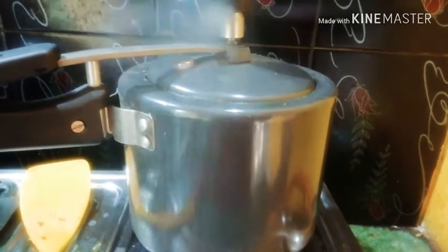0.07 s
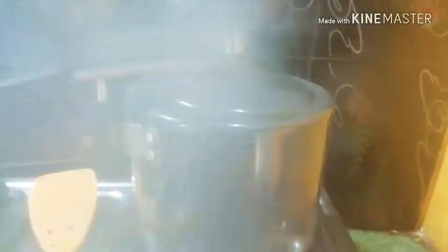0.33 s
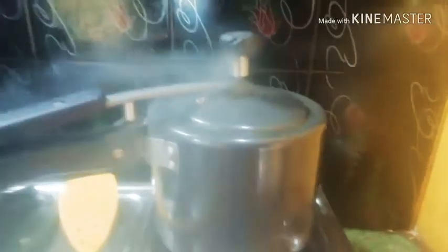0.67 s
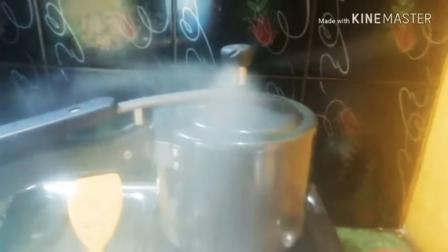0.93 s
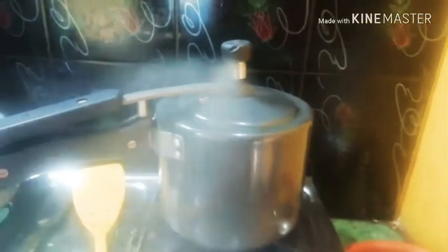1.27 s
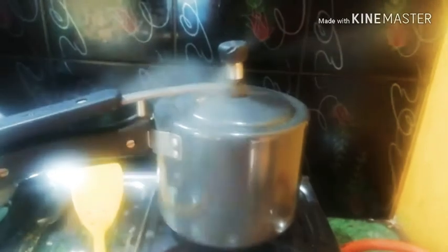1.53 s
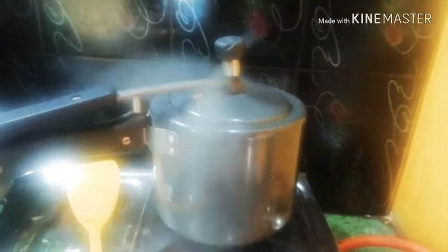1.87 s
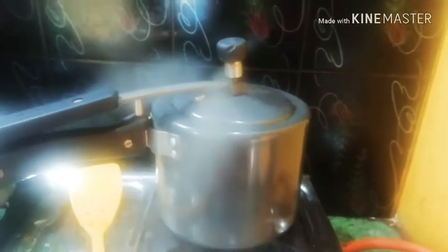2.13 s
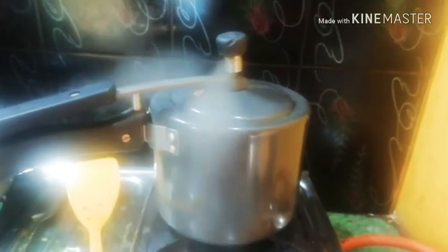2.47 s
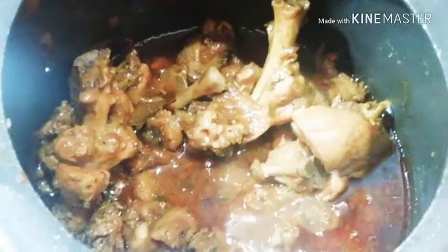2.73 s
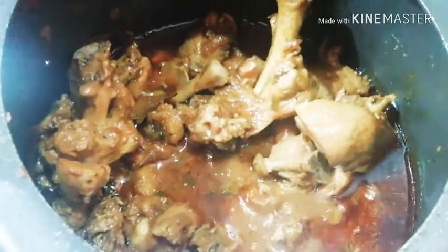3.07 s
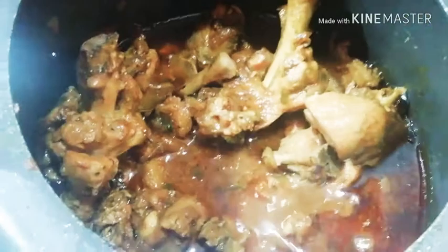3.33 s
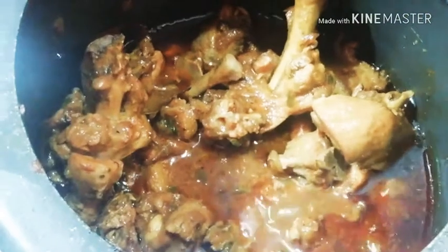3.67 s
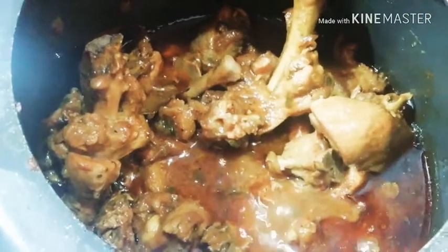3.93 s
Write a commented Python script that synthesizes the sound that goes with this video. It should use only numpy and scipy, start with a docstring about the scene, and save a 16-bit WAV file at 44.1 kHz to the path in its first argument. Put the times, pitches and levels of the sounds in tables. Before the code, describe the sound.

A pressure cooker vents steam with a thin, breathy whistle that fades by about 1 second. Faint hissing and a few wet spurts continue over a low stove rumble. At 2.9 seconds the sound switches to the open pot, closer and louder, with a soft thump and a fading low hum. Thick gravy simmers, gurgles and plops, fat spits, and a large bubble squeaks near 3.8 seconds.

```python
"""A pressure cooker vents on a kitchen stove: the steam jet sings a thin, breathy whistle that fades after a
second, while the valve hisses on and throws a few wet spurts. Near three seconds the scene cuts to the open
pot, close up and in stereo. A soft thump sounds at the cut and a low hum dies back; thick gravy seethes,
gurgles and plops, fat spits, and near the end a large bubble squeaks as it empties. A faint electrical whine
runs through both scenes."""
import sys
import numpy as np
from scipy import signal
from scipy.fft import rfft, irfft, next_fast_len
from scipy.io import wavfile
from scipy.ndimage import map_coordinates

SR = 44100
rng = np.random.default_rng(int(sys.argv[2]) if len(sys.argv) > 2 else 0)


def waveform_to_disk(signal):
    """Save audio, clipped to [-1, 1], as 16-bit WAV at the path in sys.argv[1]."""
    frames = np.transpose(np.atleast_2d(signal))
    scaled = np.clip(frames, -1, 1) * 32767
    samples = np.round(scaled).astype(np.int16)
    wavfile.write(sys.argv[1], SR, samples)


N = 176400
T = np.arange(N) / SR
CUT_S = 2.927  # the open pot is heard from here on


def amp(db):
    """Decibels to gain."""
    return 10 ** (np.asarray(db) / 20)


def unit(x):
    """Scale to rms 1."""
    return x / np.sqrt(np.mean(x ** 2) + 1e-20)


def along(points, hz):
    """Read (freq_hz, value) points on a log frequency axis."""
    freqs, values = np.transpose(points)
    return np.interp(np.log(hz + 1), np.log(freqs + 1), values)


def curve(points):
    """An envelope through (time_s, value) points."""
    return np.interp(T, *np.transpose(points))


def wobble(rate):
    """A smooth random curve, rate knots a second."""
    return map_coordinates(rng.standard_normal(8192), [T * rate], mode="wrap")


def filtered(x, response):
    """Filter x by a gain given as a function of frequency."""
    size = next_fast_len(N + SR // 4)
    return irfft(rfft(x, size) * response(np.fft.rfftfreq(size, 1 / SR)), size)[..., :N]


def noise(colour):
    """Noise of rms 1 with a (freq_hz, level_db) colour."""
    return unit(filtered(rng.standard_normal(N), lambda f: amp(along(colour, f))))


def band(hz, octaves):
    """Noise of rms 1 in a soft-skirted band."""
    return unit(filtered(rng.standard_normal(N), lambda f: 1 / (1 + (np.log2((f + 1) / hz) / octaves) ** 2)))


def pan(db):
    """Stereo gains that put the left side db above the right."""
    return amp(np.array([[.5], [-.5]]) * db)


def decay(start_s, decay_s):
    """A sudden attack with an exponential tail."""
    return (T >= start_s) * np.exp(-np.abs(T - start_s) / decay_s)


def swell(peak_s, width_s):
    """A bell-shaped rise and fall."""
    return np.exp(-.5 * ((T - peak_s) / width_s) ** 2)


def bubbles(rows):
    """Each bubble rings as a damped sine: start_s, level_db, pitch_hz, ring_cycles."""
    out, t = np.zeros(N + SR), np.arange(SR // 20) / SR
    for start_s, db, hz, cycles in rows:
        ring = np.sin(2 * np.pi * hz * t) * np.exp(-t * hz / max(cycles, .2))
        out[int(start_s * SR):][:len(t)] += amp(db) * ring
    return out[:N]


def swarm(per_s, hz, octaves, cycles, scatter_db):
    """Many small bubbles, random in time, level and pitch; rms 1."""
    when, strength, tuning = rng.random((int(per_s * N / SR), 3)).T
    pitches = hz * 2 ** (octaves * (2 * tuning - 1))
    return unit(bubbles(zip(when * N / SR, scatter_db * strength, pitches, np.full(len(when), cycles))))


def in_pot(x, ring_db):
    """The air in the pot rings along with the sound."""
    # air resonances: pitch_hz, width_hz, gain_db
    modes = [(479, 28, 4.5), (635, 13, -16), (765, 9.6, -13), (1108, 13, 4.5), (1220, 19, -4),
             (1330, 22, -2), (1424, 34, 2), (1506, 16, 4.5), (1750, 11, 3), (2240, 8.2, -6)]
    ring = lambda f: sum(amp(db) * 1j * f * width / (hz * hz - f * f + 1j * f * width)
                         for hz, width, db in modes)
    return x + amp(ring_db) * filtered(x, ring)


def room(x, t60_s=0.21):
    """Short stereo echo of the pot walls and kitchen tiles."""
    t = np.arange(SR // 3) / SR
    early_lift = 1 + 2.5 * np.exp(-t / 0.0054)
    tail = rng.standard_normal((2, len(t))) * amp(-60 * t / t60_s) * early_lift
    return signal.fftconvolve(np.atleast_2d(x), tail / np.linalg.norm(tail[0]), axes=1)[:, :N]


def kitchen():
    """Room tone: the low rumble of the stove under an even hiss."""
    # room tone spectrum: freq_hz, level_db
    colour = [(13, -36.5), (22, -1.5), (48, -3), (70, -5), (142, 0), (219, -11), (365, -21), (396, -18.5),
              (505, -21.5), (3730, -32.5), (7730, -31), (11000, -33), (14000, -33)]
    # fader on the room tone: time_s, level_db
    level = [(0, -60.5), (1.2, -61), (2.3, -61.5), (2.62, -62), (2.75, -64.5), (2.92, -64)]
    # gentle EQ cut: freq_hz, gain_db
    eq = [(500, -2.5), (2000, -4.5), (5000, -2.5), (7800, -3), (12000, -5)]
    return amp(curve(level)) * filtered(noise(colour), lambda f: amp(along(eq, f)))


def whine():
    """Thin electrical tones that drop in level at the cut."""
    # sine tones: pitch_hz, before_cut_db, after_cut_db
    tones = [(15429, -75.2, -79), (6000, -95, -110)]
    return sum(np.sqrt(2) * amp(np.where(T < CUT_S, before, after)) * np.sin(2 * np.pi * hz * T)
               for hz, before, after in tones)


def hum(pitch_hz=65.2):
    """A soft thump and a low hum that dies back, over a steady drone and rumble."""
    # envelope of the hum: time_s, level_db
    level = [(2.93, -41.5), (3.0, -37), (3.06, -38.5), (3.12, -40.5), (3.17, -47), (3.26, -44), (3.36, -51),
             (3.55, -54), (4, -67)]
    # drone by the open pot: pitch_hz, level_db
    drone_tones = [(100, -64.5), (119, -70), (193.5, -68), (231, -74), (295, -70), (361, -94)]
    low = amp(curve(level)) * np.sin(2 * np.pi * pitch_hz * (T - CUT_S) + 0.13 * wobble(3.3))
    drone = sum(amp(db + 0.64 * wobble(8.4)) * np.sin(2 * np.pi * hz * T + .5 * wobble(6))
                for hz, db in drone_tones)
    rumble = amp(-61.5) * noise([(25, 5.5), (70, 10), (130, 14), (200, -48), (600, -70)])
    thump = -amp(-34) * decay(CUT_S, decay_s=0.15)
    return np.sqrt(2) * (low + drone) + rumble + thump


def simmer():
    """The gravy seethes as a wide noise bed, with small bubbles and fine fizz on top."""
    # spectrum of the bed: freq_hz, level_db
    colour = [(76, -25), (130, 2.5), (159, -5), (232, -2.5), (413, -6.5), (485, -3.5), (654, -9.5),
              (865, -11.5), (995, -15.5), (1240, -7.5), (1420, -11.5), (2040, -16.5), (2350, -10.5),
              (3040, -18.5), (5760, -19.5), (9110, -24), (15300, -24)]
    # envelope of the bed: time_s, level_db
    level = [(2.93, -58), (3.1, -55), (3.35, -54.5), (3.44, -56), (3.6, -53.5), (3.75, -54), (4, -54)]
    # stereo image of the bed: freq_hz, left_right_correlation
    correlation = [(130, 0.92), (290, .75), (420, -0.12), (640, -0.64), (950, 0.59), (1400, 0.23),
                   (3000, -0.066), (15000, 0.074)]
    # pan across the spectrum: freq_hz, left_minus_right_db
    balance = [(200, -1), (400, 1), (750, 5), (1300, -.5), (2400, 0.5), (4400, -0.5), (6000, -5),
               (8000, -7.5), (10500, 3), (14500, 5.5)]
    width = lambda f: np.arccos(np.clip(along(correlation, f), -1, 1)) / 2
    mid_side_eq = lambda f: amp(along(colour, f)) * np.array([np.cos(width(f)), np.sin(width(f))])
    mid, side = in_pot(filtered(rng.standard_normal((2, N)), mid_side_eq), ring_db=-4)
    bed = amp(curve(level) + 0.46 * wobble(25.2)) * unit(np.array([mid + side, mid - side]))
    small = in_pot(swarm(per_s=80, hz=1105, octaves=1.07, cycles=1.27, scatter_db=13), ring_db=-0.5)
    fizz = swarm(per_s=150, hz=6400, octaves=0.97, cycles=3, scatter_db=27)
    popping = amp(-62.5) * small + amp(-69) * fizz
    return filtered(bed + 0.4 * popping + 0.78 * room(popping), lambda f: pan(along(balance, f)))


def gurgles():
    """Steam pockets heave deep in the gravy, each a short low tone."""
    # steam pockets: peak_s, level_db, pitch_hz, width_s
    pockets = [(3.13, -52, 205, 0.0078), (3.21, -55.5, 230, .008), (3.23, -55, 200, 0.0089),
               (3.303, -50.5, 220, .008), (3.352, -51.5, 232, 0.013), (3.394, -50, 225, 0.0044),
               (3.64, -52, 290, 0.015), (3.70, -57, 295, 0.0098), (3.654, -58.5, 414, 0.015)]
    return sum(amp(db) * swell(peak_s, width_s) * np.sin(2 * np.pi * (hz * T + rng.random()))
               for peak_s, db, hz, width_s in pockets)


def spits():
    """Droplets of fat burst in short bright sizzles."""
    # droplets: start_s, relative_db, centre_hz, decay_s, left_minus_right_db
    droplets = [(2.938, -59, 8300, 0.0036, -11), (3.032, -48.5, 5100, 0.0046, 3),
                (3.166, -56, 7500, .003, -9), (3.221, -50, 4400, 0.0068, 15), (3.242, -49, 4500, .005, 2),
                (3.457, -54.5, 7500, 0.0044, -12.5), (3.5356, -48.5, 3940, 0.0036, 11),
                (3.549, -55, 13500, .003, -3), (3.777, -49, 11900, 0.0023, 0), (3.672, -49, 8000, .003, 6),
                (3.679, -48.5, 7560, 0.0084, 1), (3.74, -43, 7500, 0.0021, 0),
                (3.747, -51.5, 7800, 0.032, 0), (3.744, -53, 4780, 0.04, 0), (3.776, -47, 7800, 0.0059, 0),
                (3.949, -50.5, 5500, 0.0045, -1), (3.985, -42, 4570, .005, 8.5)]
    dry = sum(amp(db - 6) * decay(start_s, decay_s) * band(hz, octaves=.19) * pan(pan_db)
              for start_s, db, hz, decay_s, pan_db in droplets)
    return dry + amp(-3.5) * room(dry)


def squeak(start_s=3.826, pitch_hz=1561, sag_hz_per_s=2800, decay_s=.06):
    """A large bubble empties through a fluttering hole; its pitch sags."""
    age = np.maximum(T - start_s, 0)
    phase = 2 * np.pi * np.cumsum(pitch_hz - sag_hz_per_s * age) / SR
    envelope = (1 - np.exp(-age / .0005)) * np.exp(-(age / decay_s) ** 1.04)
    rough_tone = (1 + .5 * wobble(220)) * np.sin(phase + .6 * wobble(300))
    breath = amp(-14) * band(2100, octaves=.3)
    dry = amp(-42.5) * envelope * (rough_tone + breath)
    return dry + amp(-10) * room(dry)


def plops(left_lag_s=0.00075):
    """Large bubbles burst with a wet spatter and ring the pot."""
    # bursts in the gravy: start_s, relative_db, pitch_hz, ring_cycles
    bursts = [(3.008, -52, 695, .6), (3.012, -47, 1800, 0.63), (3.168, -42, 700, 0.88),
              (3.1755, -46, 1250, 0.7), (3.1805, -39.5, 1620, 2), (3.203, -50, 1630, 3),
              (3.316, -46, 1000, 0.81), (3.404, -56, 800, .8), (3.483, -46, 550, .4),
              (3.489, -43.5, 900, .6), (3.494, -41, 1760, 0.73), (3.581, -42.5, 850, .7),
              (3.588, -48, 750, .6), (3.706, -43.5, 900, 1), (3.826, -36.5, 830, .6), (3.886, -41, 780, 1),
              (3.902, -45, 1850, 1.5), (3.965, -38.5, 1020, 0.77)]
    spatter = sum(amp(db - 10.5) * decay(start_s, decay_s=0.0078) * band(hz, octaves=0.66)
                  for start_s, db, hz, _ in bursts)
    dry = in_pot(bubbles(bursts) + spatter, ring_db=-4.5)
    wet = dry + amp(-1) * room(dry)
    eq = lambda f: amp(along([(100, -12), (400, 0), (680, -0.5), (1100, -0.5), (2200, 4.5), (3500, -17)], f))
    balance = lambda f: pan(along([(300, 2), (750, 5.2), (1400, 2.3)], f))
    lag = lambda f: np.exp(1j * np.pi * f * left_lag_s * np.array([[-1], [1]]))
    return filtered(wet, lambda f: eq(f) * balance(f) * lag(f))


def steam():
    """The valve hisses and now and then spurts wet steam."""
    # envelope of the jet: time_s, level_db
    level = [(0, -82), (.3, -75), (.7, -77), (1, -79.5), (2, -79), (2.35, -75), (2.62, -76), (2.72, -79),
             (2.9, -84)]
    # spectrum of the jet: freq_hz, level_db
    colour = [(400, -3), (1200, -6), (2500, -4.5), (4500, -7.5), (6500, -10), (7300, 2.5), (7900, 9),
              (8600, -0.5), (10000, -2), (15000, 2)]
    # wet spurts: peak_s, level_db, width_s, centre_hz, width_octaves
    spurts = [(1.26, -74, 0.02, 11000, 0.78), (1.695, -77, .04, 7600, 0.22),
              (2.22, -76.5, 0.028, 7800, 0.28), (2.207, -77, .035, 13900, .2),
              (2.575, -83, 0.028, 5000, .15), (2.574, -79.5, 0.024, 1910, 0.12)]
    jet = amp(curve(level) + 0.44 * wobble(15)) * noise(colour)
    return jet + sum(amp(db) * swell(peak_s, width_s) * band(hz, octaves)
                     for peak_s, db, width_s, hz, octaves in spurts)


def whistle(fuzz_hz=44.8, twin_ratio=1.022, twin_db=-3, side_fade_db_per_s=11, sputter_db=1.2):
    """The jet sings in fuzzy partials, each with a weaker twin just above; the main one lasts longest."""
    # envelope of the whistle: time_s, level_db
    level = [(0, -72), (.1, -69), (.27, -67), (.5, -65.5), (.69, -67), (.8, -76), (.95, -79.5), (1.06, -90),
             (1.3, -110)]
    # base pitch, sagging with the pressure, then lifting a little: time_s, pitch_hz
    pitch = [(0, 424.4), (.12, 419.7), (.25, 413.8), (.55, 414.5), (1.1, 419)]
    # partials of the base pitch: harmonic_number, relative_db
    partials = [(7, -18.5), (8, -10), (9, -1), (12, -29), (14, -30), (16, -24), (18, -27.5), (20, -25.5)]
    phase = 2 * np.pi * np.cumsum(curve(pitch)) / SR
    main_db = max(db for _, db in partials)
    out = np.zeros(N)
    for harmonic, db in partials:
        fade_db = 0 if db == main_db else side_fade_db_per_s * (.4 - T)
        for ratio, offset_db in [(1, 0), (twin_ratio, twin_db)]:
            # slow noise shakes level and phase, which makes the tone breathy
            drift = filtered(rng.standard_normal((2, N)), lambda f: 1 / (1 + (f / fuzz_hz) ** 2) ** 2)
            fuzz = unit(drift[0]) + 1j * unit(drift[1])
            fuzz /= 1 + 0.15 * np.abs(fuzz)  # soften the peaks
            tone = unit(np.real(fuzz * np.exp(1j * harmonic * ratio * phase)))
            out += amp(db + offset_db + fade_db) * tone
    return amp(curve(level) + sputter_db * wobble(33.7)) * out


def scene():
    """The closed cooker in mono, then a hard cut to the open pot in stereo."""
    closed = whistle() + steam() + kitchen()
    opened = hum() + simmer() + gurgles() + plops() + squeak() + spits()
    cut = np.clip((T - CUT_S) / 0.00034, 0, 1)
    return (1 - cut) * closed + cut * opened + whine()


def record(dry, top_hz=15500):
    """A brick-wall low-pass takes off the highest treble."""
    return filtered(dry, lambda f: f < top_hz)


dry = scene()
out = record(dry)
waveform_to_disk(out)
```